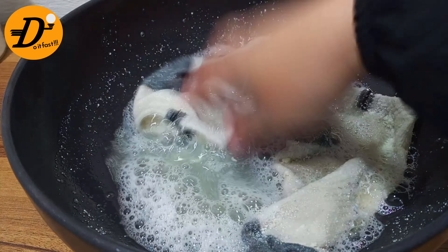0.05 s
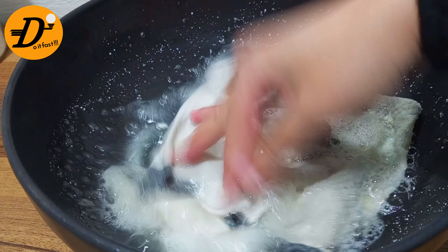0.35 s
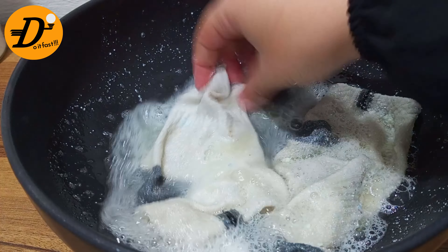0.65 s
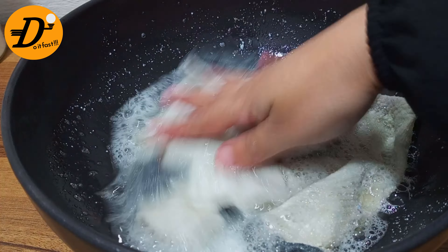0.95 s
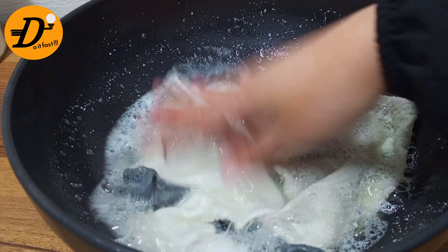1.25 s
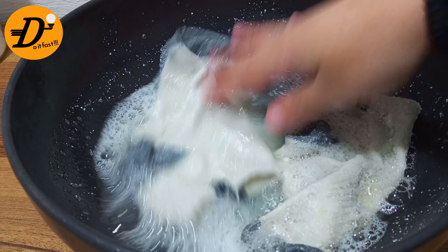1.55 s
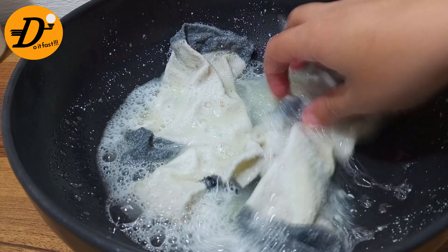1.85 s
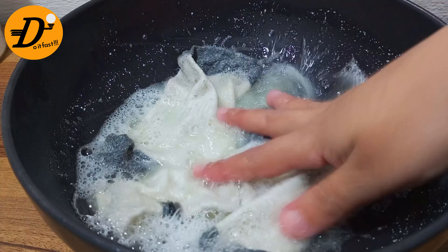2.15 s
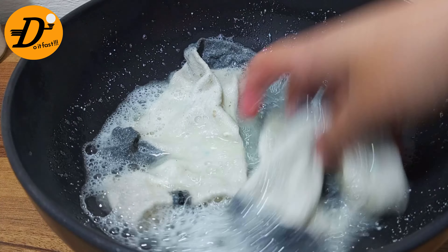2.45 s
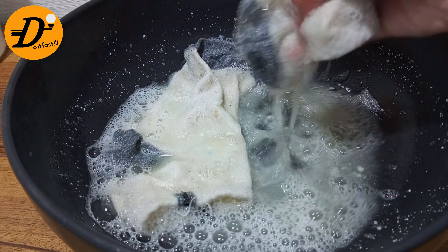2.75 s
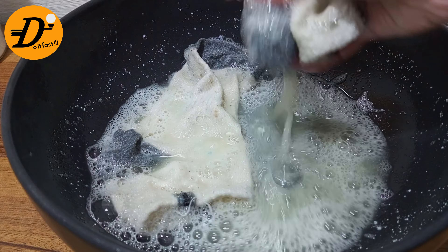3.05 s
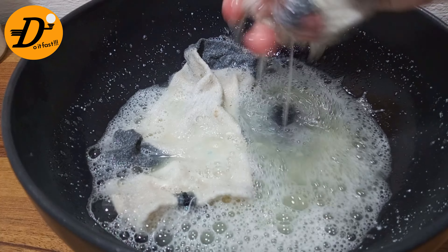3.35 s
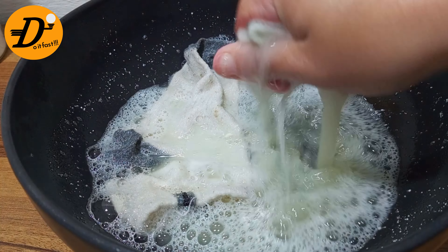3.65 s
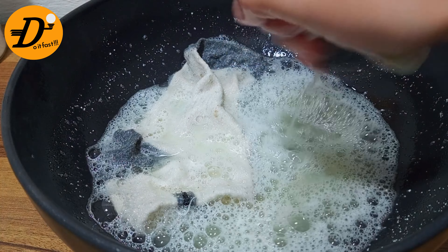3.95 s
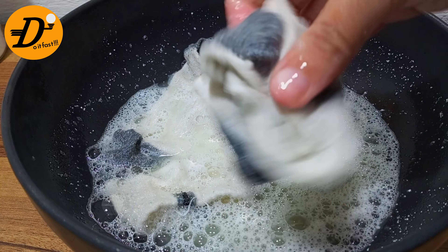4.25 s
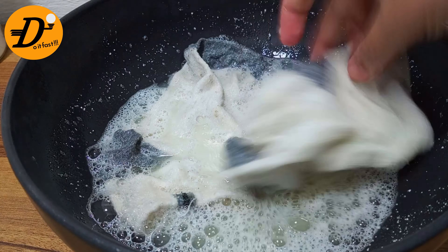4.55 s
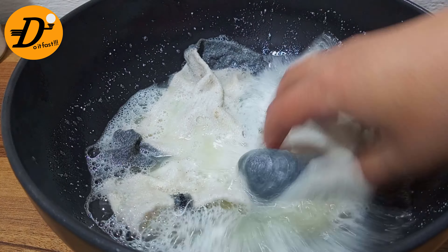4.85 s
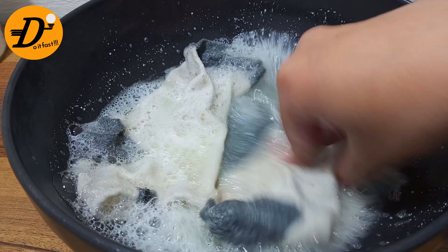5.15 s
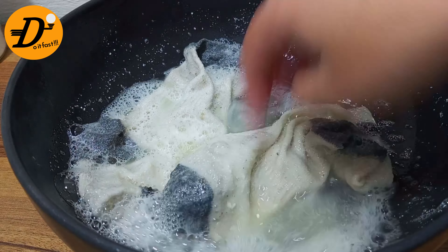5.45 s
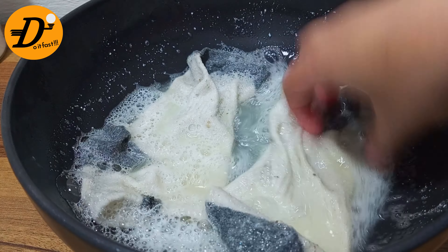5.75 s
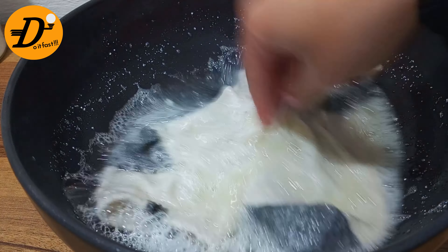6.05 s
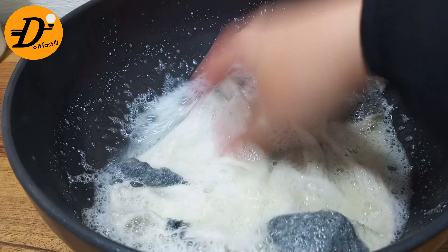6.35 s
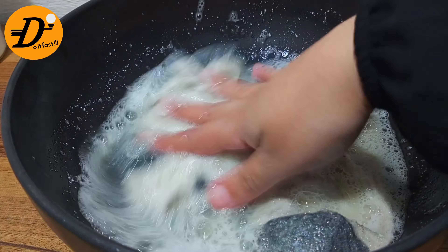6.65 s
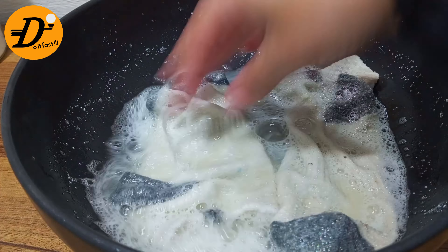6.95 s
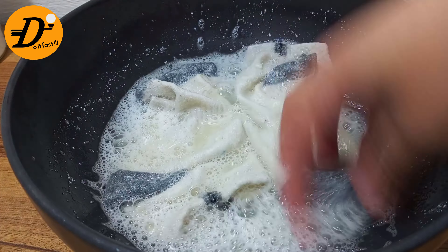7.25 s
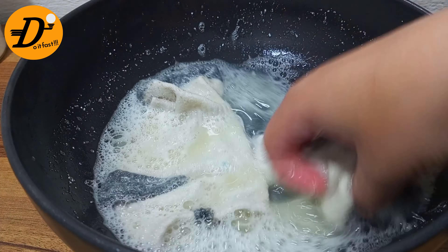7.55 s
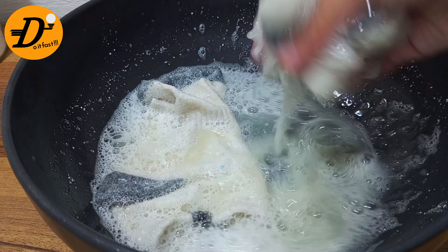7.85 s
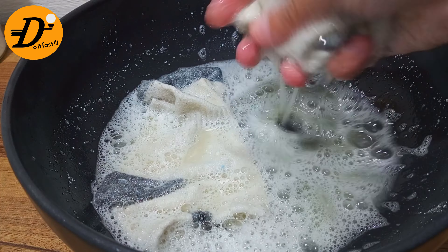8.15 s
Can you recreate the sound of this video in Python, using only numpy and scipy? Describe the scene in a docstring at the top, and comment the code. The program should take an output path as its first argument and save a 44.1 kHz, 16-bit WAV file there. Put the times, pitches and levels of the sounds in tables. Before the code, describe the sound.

Wet fabric is washed by hand in a pan, with sloshing, fizzing foam, trickling water and a few soft thuds.

```python
"""In a small room, a hand kneads, lifts and wrings wet cloths in a pan of soapy water.
Each bubble is a resonator, the higher the smaller it is: water sloshes, squelches through the weave
and fizzes as foam. Trapped air pockets burst with a slap, films tick, drops plink and streams patter.
Each push against the bottom thuds and excites the modes of the pan, which hums on.
Near walls add a short reverberation above a low murmur of air."""
import sys
import numpy as np
from scipy import signal
from scipy.fft import rfft, irfft
from scipy.io import wavfile

SR = 44100
rng = np.random.default_rng(int(sys.argv[2]) if len(sys.argv) > 2 else 0)


def generate_wav(sig):
    """Save sig (samples, or channels by samples) to the path in sys.argv[1] as 16-bit PCM at SR."""
    pcm = np.round(np.clip(np.atleast_2d(sig).T, -1, 1) * 32767).astype(np.int16)
    wavfile.write(sys.argv[1], SR, pcm)


N = 365588
TIME = np.arange(N) / SR

# spectra of the bubble populations: (frequency [Hz], relative level [dB])
SLOSH_SPECTRUM = [(300, -8.5), (480, -18), (620, -1.5), (780, -1.5), (1100, -0.5), (1400, -8), (1700, -1.5)]
SQUELCH_SPECTRUM = [(1700, -7), (2100, -11), (2500, -3.5), (3100, -7.5), (3800, -3), (4600, -1.5)]
FOAM_SPECTRUM = [(5000, -7.5), (6000, 1.5), (7000, -6.5), (8500, -7), (10300, 0), (12000, -11),
                 (15000, -14)]
PATTER_SPECTRUM = [(1600, -5), (2000, -5.5), (2500, 12), (3100, -4.5), (3800, 7.5)]
GURGLE_SPECTRUM = [(480, 2.5), (720, 8), (1000, -9), (1500, -7.5)]
# strokes through the water, the deep ones dull: (time [s], duration [s], level [dB], brightness [dB])
STIR_GESTURES = [(0, 0.028, -46.5, -1), (.06, 0.4, -68.5, -8), (.17, 0.28, -57, -3.5),
                 (.7, 0.12, -62.5, -4), (.9, 0.078, -64, -5.5), (.97, 0.37, -63.5, -3),
                 (1.35, 0.28, -77.5, -8), (1.61, 0.024, -64, -4), (1.78, 0.12, -57.5, 0),
                 (1.92, 0.36, -56, 3), (2.32, 0.24, -56, 1), (2.47, 0.12, -62, -2), (2.59, 0.09, -63, 12),
                 (4.655, 0.024, -55, -1), (4.81, 0.2, -58.5, -1.5), (5.06, 0.25, -60, -2),
                 (5.6, 0.14, -61, 3), (5.83, 0.071, -61.5, -1.5), (6.21, 0.097, -60, -2),
                 (6.44, 0.085, -60.5, -4), (6.61, 0.16, -62, -3), (6.8, 0.17, -61, -2.5),
                 (7.1, 0.044, -59, -1.5), (7.235, 0.025, -57, -4), (7.35, 0.016, -66.5, -8),
                 (7.45, 0.026, -61, -3), (7.55, 0.11, -60, -3.5), (7.69, 0.15, -60, 1.5),
                 (7.925, 0.36, -62.5, -0.5), (8.228, 0.019, -48.5, 1.5)]
# twists of the lifted cloth: (time [s], duration [s], level [dB], brightness [dB])
WRING_GESTURES = [(2.85, 0.035, -58, 0.5), (3.11, 0.28, -64.5, -1), (3.305, 0.051, -48.5, -1.5),
                  (3.37, 0.08, -56.5, 4), (3.43, 0.46, -63, 4), (3.6, 0.026, -50.5, -1),
                  (3.94, 0.088, -50, -2.5), (4.06, 0.42, -59.5, 0), (4.3, 0.021, -51, -1),
                  (4.388, 0.046, -51.5, 0), (4.46, 0.041, -55.5, 1)]
# the water's response to each kind of gesture, and at rest: (slosh [dB], squelch [dB], foam [dB])
STIR_MIX_DB = (1.57, 0.17, -3)
WRING_MIX_DB = (-16, -1.9, 0.083)
RESTING_DB = (-72.5, -72, -73)
# level change per unit of brightness: (slosh [dB/dB], squelch [dB/dB], foam [dB/dB])
BRIGHTNESS_SLOPES = (-1.12, 0.61, 0.32)
# water running off the cloth: (time [s], duration [s], patter level [dB], gurgle level [dB])
RUNOFF = [(2.659, 0.26, -62.5, -72.5), (2.996, 0.49, -63, -69), (3.253, 0.34, -66, -67),
          (3.31, 0.19, -61, -75), (3.472, 0.024, -51, -64), (3.575, 0.04, -49.5, -74),
          (3.646, 0.13, -54, -82), (8.026, 0.3, -63.5, -67), (8.236, 0.018, -44.5, -57.5)]
# air pockets bursting under the cloth: (time [s], level [dB], frequency [Hz], splash level [dB])
POCKET_BURSTS = [(0.8707, -21.5, 974, -53), (4.666, -35, 1000, -58), (5.079, -33, 1300, -52.5),
                 (5.4814, -8, 1650, -32), (5.482, -15.5, 700, -39), (5.9698, -29.5, 1180, -49.5),
                 (6.6038, -15, 1010, -37), (6.6043, -18, 580, -51)]
# the loudest drops and bubbles: (time [s], level [dB], frequency [Hz])
DROP_IMPACTS = [(0.049, -38, 1180), (.711, -58.5, 778), (.982, -43.5, 750), (1.215, -41.5, 2570),
                (1.628, -52, 805), (1.918, -25.5, 3700), (2.097, -40, 3040), (2.1923, -33.5, 2290),
                (2.595, -36, 2420), (2.917, -37, 9600), (3.246, -35.5, 2490), (3.254, -36.5, 850),
                (3.263, -37, 2430), (3.305, -28.5, 9160), (3.394, -31, 3030), (3.489, -45.5, 778),
                (3.505, -34.5, 2350), (3.622, -34, 2870), (3.732, -47, 2460), (3.777, -32.5, 3530),
                (5.134, -41, 5500), (5.655, -49, 773), (6.446, -48.5, 740), (6.663, -42, 990),
                (8.004, -47, 736), (8.136, -43.5, 2200)]
# wet folds and soap films parting: (time [s], level [dB], centre frequency [Hz])
FILM_TEARS = [(0.316, -40, 7240), (1.027, -46, 4400), (1.277, -44.5, 3000), (1.7722, -43, 4500),
              (1.786, -28.5, 2720), (2.1927, -31, 5940), (2.473, -33, 3050), (3.32, -39, 1790),
              (3.377, -32, 5400), (3.403, -26.5, 8500), (3.645, -32.5, 7500), (3.794, -41.5, 2470),
              (3.961, -42, 8000), (4.302, -38, 6500), (5.968, -34.5, 4500), (6.298, -37, 7500),
              (7.106, -43.5, 3020), (7.343, -41, 2650), (7.709, -37, 3700), (8.091, -37.5, 7500),
              (8.103, -31.5, 6400), (8.21, -33, 6200)]
# water forced from the cloth: (time [s], duration [s], level [dB], centre [Hz], bandwidth [octaves])
JETS = [(0.306, 0.029, -43, 4950, 1.4), (1.788, 0.019, -38.5, 3060, 2), (1.887, 0.054, -38.5, 3800, 0.93),
        (2.099, 0.039, -42.5, 1060, 4.2), (2.193, 0.0072, -31, 5000, 2.9), (2.47, 0.051, -41.5, 3380, 1.5),
        (3.23, 0.042, -44.5, 1270, 2.2), (5.4724, 0.01, -27.5, 7200, 1.7),
        (6.601, 0.0055, -27.5, 2400, 1.2), (8.257, 0.017, -37, 3460, 1.7)]
# air pressed out from under the cloth: (time [s], duration [s], level [dB], frequency [Hz])
AIR_GULPS = [(1.782, 0.065, -40, 230.6), (1.918, 0.14, -59.5, 214), (2.195, 0.063, -55.5, 194.6),
             (2.406, 0.064, -43.5, 221.6), (4.671, 0.056, -48, 206), (4.872, 0.055, -53, 233.3),
             (5.175, 0.065, -43, 196), (5.463, 0.04, -43, 215), (5.716, 0.054, -43, 215),
             (6.445, 0.025, -53, 185), (6.59, .05, -53.5, 223), (7.352, 0.03, -35.5, 255),
             (7.552, 0.054, -40, 221.7), (7.674, 0.053, -39, 233.7)]
# cloth and water meeting the bottom: (time [s], duration [s], level [dB], frequency [Hz])
BOTTOM_THUDS = [(1.789, 0.11, -53.5, 124.5), (1.925, 0.216, -60, 126), (2.2, 0.08, -52.5, 120.6),
                (2.418, 0.079, -47, 118.5), (4.688, 0.049, -56.5, 114), (4.882, 0.076, -47.5, 120),
                (5.19, 0.077, -51.5, 105), (5.29, 0.09, -50, 131.6), (5.741, 0.05, -42, 118.5),
                (5.84, 0.062, -54.5, 118), (7.366, 0.048, -37, 131.7), (7.555, 0.081, -44, 139.6),
                (7.704, 0.043, -43, 124)]
# the hand striking the pan: (time [s], level [dB])
HAND_KNOCKS = [(4.663, -42.5), (7.36, -41.5)]
# modes of the filled pan: (frequency [Hz], gain [dB], 60 dB decay time [s])
PAN_MODES = [(117, -4, 0.33), (225, -13, 0.19), (440, 7, 0.85), (601, -2.5, 0.16), (780.5, 2, 0.11),
             (1070, -7, 0.15), (1760, -3.5, 0.17)]
# reverberation of the room: (frequency [Hz], 60 dB decay time [s])
ROOM_DECAY = [(100, 0.52), (400, 0.53), (1000, 0.3), (3500, 0.26), (12000, 0.19)]
# background noise of the room: (frequency [Hz], relative spectral density [dB])
AIR_SPECTRUM = [(30, -13.5), (75, 0.5), (125, 4.5), (220, -0.5), (400, -6.5), (800, -12.5), (2000, -15.5),
                (16000, -22)]
# dips in the microphone's response: (frequency [Hz], bandwidth [Hz], depth [0-1])
MIC_NOTCHES = [(4490, 1900, 0.77), (8130, 1700, 0.47), (13700, 9300, 0.89)]


def washing(slosh_db, squelch_db, foam_db):
    """Bubble resonance rises as size falls: large ones slosh, smaller ones squelch, the finest fizz."""
    slosh = bubbles(SLOSH_SPECTRUM, per_s=910, spread_db=2.5, cycles=15.3, clump_db=0.95)
    squelch = bubbles(SQUELCH_SPECTRUM, per_s=2000, spread_db=1.8, cycles=18, clump_db=3)
    foam = bubbles(FOAM_SPECTRUM, per_s=4500, spread_db=1.8, cycles=38, clump_db=5)
    # a few bubbles float free of the cloth and ring longer
    plinks = bubbles(PATTER_SPECTRUM, per_s=60, spread_db=3, cycles=26, clump_db=2)
    return (from_db(slosh_db - 6) * slosh
            + from_db(squelch_db - 0.5) * squelch
            + from_db(foam_db + 2.5) * foam
            + from_db(squelch_db - 9) * plinks
            + crackle(foam_db + 1))


def gesture_levels():
    """Incoherent sources add in power: gestures plus resting water give slosh, squelch and foam in dB."""
    power = from_db(RESTING_DB)[:, None] ** 2 * np.ones(N)
    for gestures, mix in ((STIR_GESTURES, STIR_MIX_DB), (WRING_GESTURES, WRING_MIX_DB)):
        for start, length, db, brightness in gestures:
            for layer, mix_db, slope in zip(power, mix, BRIGHTNESS_SLOPES):
                amplitude = swell(length) * from_db(db + mix_db + slope * brightness)
                add(layer, start, amplitude ** 2)
    uneven_db = 1.93 * drift(per_s=33)
    return 10 * np.log10(power) + uneven_db


def swell(length, sag_db=1.5, settle_db_per_s=254):
    """Driven motion builds up, sags as the gesture tires, then decays exponentially once left alone."""
    t = TIME[:int((length + 0.3) * SR)]
    attack_s = 0.00067 + 0.067 * length
    fall_db = sag_db * np.minimum(t / length, 1) + settle_db_per_s * np.maximum(t - length, 0)
    return np.minimum(t / attack_s, 1) * from_db(-fall_db)


def bubbles(spectrum, per_s, spread_db, cycles, clump_db, count=24):
    """Bubbles form as a Poisson process of wandering rate, and their free oscillations add; rms 1."""
    rate = per_s * from_db(clump_db * drift(per_s=90))
    births = np.flatnonzero(rng.random(N) < rate / SR)
    strengths = from_db(spread_db * np.minimum(rng.exponential(1, N), 4))[births]
    pitch_index = rng.integers(0, count, N)[births]
    pitches = np.geomspace(spectrum[0][0], spectrum[-1][0], count)
    out = np.zeros(N + SR)
    for k, hz in enumerate(pitches):
        ring = damped_ring(hz, cycles, rise=0.025)[:int(cycles * SR / hz)]
        ring = ring * from_db(at_hz(spectrum, hz)) / np.linalg.norm(ring)
        chosen = pitch_index == k
        np.add.at(out, births[chosen, None] + np.arange(len(ring)), strengths[chosen, None] * ring)
    return rms_one(band(out[:N], pitches[0] / 1.3, pitches[-1] * 1.3))


def damped_ring(hz, cycles, rise):
    """A damped oscillator loses 60 dB in `cycles`; a bubble's pitch rises near the surface; peak 1."""
    turns = TIME[:SR // 20] * hz
    swing = np.sin(2 * np.pi * turns * (1 + rise * np.minimum(turns / cycles, 1)))
    onset = 1 - np.exp(-2 * turns)
    wave = swing * from_db(-60 * turns / cycles) * onset
    return wave / np.abs(wave).max()


def crackle(level_db, per_s=45, spread_db=3.5, count=4):
    """Soap films rupture independently: shot noise of unequal snaps, louder when the foam is worked."""
    strengths = from_db(spread_db * np.minimum(rng.exponential(1, N), 3))
    impulses = (rng.random(N) < per_s / SR) * strengths * from_db(level_db)
    band_index = rng.integers(0, count, N)
    out = np.zeros(N)
    for k, hz in enumerate(np.geomspace(2500, 7000, count)):
        snap = burst(0.0012, hz, octaves=1.8, grain_db=3, fade_db=8)[:SR // 200]
        out += signal.oaconvolve(impulses * (band_index == k), snap)[:N]
    return out


def streams():
    """A falling stream breaks into drops that entrain air: bubbles ping, patter or gurgle by size."""
    patter_power, gurgle_power = np.zeros((2, N))
    for start, length, patter_db, gurgle_db in RUNOFF:
        add(patter_power, start, (from_db(patter_db) * swell(length)) ** 2)
        add(gurgle_power, start, (from_db(gurgle_db) * swell(length)) ** 2)
    patter = bubbles(PATTER_SPECTRUM, per_s=280, spread_db=3, cycles=32, clump_db=5)
    pings = from_db(-4) * bubbles(FOAM_SPECTRUM, per_s=220, spread_db=3, cycles=50, clump_db=3)
    gurgle = bubbles(GURGLE_SPECTRUM, per_s=350, spread_db=3, cycles=10, clump_db=4)
    return np.sqrt(patter_power) * (patter + pings) + np.sqrt(gurgle_power) * gurgle


def slaps(ring_s=0.0085, swell_s=0.013):
    """A flat air pocket bursts and rings as a heavily damped cavity; its shape sets the overtone."""
    out = np.zeros(N)
    shapes = rng.standard_normal(len(POCKET_BURSTS))
    for start, shape in ():
        pass
    for (start, db, hz, splash_db), shape in zip(POCKET_BURSTS, shapes):
        overtone_hz = hz * 1.8 * np.exp(0.08 * shape)
        film_snap = burst(0.002, hz=2700, octaves=1, grain_db=3, fade_db=5)
        add(out, start, from_db(db - 6.5) * damped_ring(hz, cycles=ring_s * hz, rise=0.062))
        add(out, start, from_db(db - 12) * damped_ring(overtone_hz, cycles=10.6, rise=0.034))
        add(out, start, from_db(db - 18) * film_snap)
        # the splash swells until the pocket bursts, throws spray and falls back duller
        surge = burst(swell_s, hz=1040, octaves=2.4, grain_db=4, fade_db=-17)
        spray = burst(swell_s, hz=5330, octaves=1.3, grain_db=-3, fade_db=-20)
        fall = burst(0.032, hz=850, octaves=1.12, grain_db=-0.5, fade_db=13)
        add(out, start - swell_s, from_db(splash_db - 1.5) * surge)
        add(out, start - swell_s / 2, from_db(splash_db - 5.5) * spray)
        add(out, start, from_db(splash_db - 9) * fall)
    return band(out, 410, 11300)


def drops(ring_s=0.017):
    """A drop's impact ticks and excites a bubble's resonance; the tiniest bubbles decay soonest."""
    out = np.zeros(N)
    for start, db, hz in DROP_IMPACTS:
        tick = burst(0.002, hz=4500, octaves=2.2, grain_db=3, fade_db=6)
        add(out, start, from_db(db) * damped_ring(hz, cycles=min(ring_s * hz, 45), rise=0.015))
        add(out, start, from_db(db - 9.5) * tick)
    return out


def ticks():
    """A wet film tears in a transient so brief that its spectrum is broad."""
    out = np.zeros(N)
    for start, db, hz in FILM_TEARS:
        add(out, start, from_db(db - 6) * burst(0.0036, hz, octaves=2.02, grain_db=5.5, fade_db=-3))
    return band(out, 500, 13000)


def spurts():
    """Pressure drives water and air out of the squeezed cloth as grainy jet noise."""
    out = np.zeros(N)
    for start, length, db, hz, octaves in JETS:
        add(out, start, from_db(db - 3) * burst(length, hz, octaves, grain_db=6, fade_db=1.5))
    return out


def pushes():
    """The hand excites low oscillations: gulps and thuds in a rumble of cloth, and knocks on the pan."""
    out = np.zeros(N)
    for start, length, db, hz in AIR_GULPS:
        add(out, start, from_db(db - 5) * throb(length, hz, sag=0.1, wobble=0.1295))
        add(out, start, from_db(db - 3.5) * burst(length, hz, octaves=0.9, grain_db=1, fade_db=5.5))
    for start, length, db, hz in BOTTOM_THUDS:
        add(out, start, from_db(db + 1) * throb(length, hz, sag=0.057, wobble=0.14))
        add(out, start, from_db(db - 6.5) * burst(length, hz, octaves=1.4, grain_db=3, fade_db=6))
    for start, db in HAND_KNOCKS:
        add(out, start, from_db(db) * damped_ring(hz=449, cycles=35, rise=0))
    return out


def throb(length, hz, sag, wobble):
    """The resonance of a large air pocket sags and wavers as it is squeezed under the cloth."""
    progress = TIME[:SR // 4] / length
    waver = np.interp(progress, np.linspace(0, 1, 6), rng.standard_normal(6))
    pitch = hz * np.exp(sag * (0.5 - np.minimum(progress, 1)) + wobble * waver)
    envelope = np.clip(progress * 5, 0, 1) * np.clip((1.15 - progress) * 2, 0, 1)
    return rms_one_over(np.sin(2 * np.pi * np.cumsum(pitch) / SR) * envelope, length)


def burst(length, hz, octaves, grain_db, fade_db):
    """Many tiny impacts superpose into ragged band-limited noise; a negative fade makes it swell."""
    noise, roughness = rng.standard_normal((2, SR // 4))
    progress = TIME[:len(noise)] / length
    gate = np.clip(progress * 20, 0, 1) * np.clip((1.1 - progress) * 5, 0, 1)
    envelope = gate * from_db(-fade_db * np.minimum(progress, 2))
    grains = noise * from_db(grain_db * roughness) * envelope
    edge_ratio = 2 ** (octaves / 2)
    return rms_one_over(band(grains, hz / edge_ratio, hz * edge_ratio), length)


def pan(x):
    """Forced vibration: the pan's normal modes ring on after whatever moves in it."""
    return x + sum(from_db(db) * resonate(x, hz, width_hz=np.log(1000) / (np.pi * t60))
                   for hz, db, t60 in PAN_MODES)


def room(x, wet_db, gap_s):
    """Reverberation: dense reflections from near walls decay exponentially, the treble first."""
    t = TIME[:SR // 2]
    noise = rng.standard_normal((2, len(t)))
    edges_hz = np.geomspace(60, 18000, 10)
    tail = np.zeros(len(t))
    for k, (low, high) in enumerate(zip(edges_hz, edges_hz[1:])):
        t60 = at_hz(ROOM_DECAY, np.sqrt(low * high))
        tail += band(noise[k % 2], low, high) * from_db(-60 * t / t60)
    tail *= t > gap_s
    return x + from_db(wet_db) * signal.fftconvolve(x, tail / np.linalg.norm(tail))[:N]


def room_air(level_db=-61.5):
    """The air of the room murmurs as stationary noise, strongest in the bass."""
    spectrum = from_db(at_hz(AIR_SPECTRUM, np.arange(N // 2 + 1) * SR / N))
    murmur = irfft(rfft(rng.standard_normal(N)) * spectrum, N)
    return from_db(level_db) * rms_one(murmur)


def resonate(x, hz, width_hz):
    """A second-order resonator with unit gain at its peak."""
    radius = np.exp(-np.pi * width_hz / SR)
    numerator = np.array([1, 0, -1]) * (1 - radius ** 2) / 2
    denominator = [1, -(1 + radius ** 2) * np.cos(2 * np.pi * hz / SR), radius ** 2]
    return signal.lfilter(numerator, denominator, x + 1e-18)


def band(x, low, high):
    """A band-pass filter, its edges in Hz held below half the sampling rate."""
    high = min(high, 0.45 * SR)
    low = min(low, high / 1.05)
    return signal.sosfilt(signal.butter(2, [low, high], "band", fs=SR, output="sos"), x)


def drift(per_s):
    """Linear interpolation between random values gives a slow fluctuation; rms 1."""
    knots = rng.standard_normal(2000)
    return rms_one(np.interp(TIME * per_s, np.arange(len(knots)), knots))


def add(out, start, sound):
    """Superposition: a sound joins the mix at a start time in seconds."""
    i = max(int(start * SR), 0)
    out[i:i + len(sound)] += sound[:max(N - i, 0)]


def at_hz(table, hz):
    """Interpolation on a logarithmic frequency axis."""
    frequencies, values = np.transpose(table)
    return np.interp(np.log(np.maximum(hz, 1)), np.log(frequencies), values)


def from_db(db):
    """Amplitude ratio of a level in decibels."""
    return 10 ** (np.asarray(db) / 20)


def rms_one(x):
    """Normalisation to unit power."""
    return x / np.sqrt(np.mean(x ** 2) + 1e-20)


def rms_one_over(x, length):
    """Normalisation to the energy of unit power lasting `length` seconds."""
    return x / np.sqrt(np.sum(x ** 2) / (length * SR))


def scene():
    """Source and filter: water and hand drive the pan, which radiates into the room; one channel."""
    splashing = washing(*gesture_levels()) + streams() + slaps() + drops() + ticks() + spurts()
    radiated = pan(splashing + pushes())
    return (room(radiated, wet_db=-9.5, gap_s=0.004) + room_air())[None]


def record(dry):
    """The microphone's frequency response hollows three treble bands; a steep low-pass cuts the top."""
    for hz, width_hz, depth in MIC_NOTCHES:
        dry = dry - depth * resonate(dry, hz, width_hz)
    cutoff_hz = 15850
    return signal.sosfilt(signal.ellip(12, 0.1, 80, cutoff_hz, fs=SR, output="sos"), dry)


dry = scene()
out = record(dry)
generate_wav(out)
```